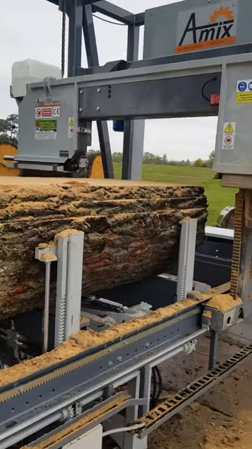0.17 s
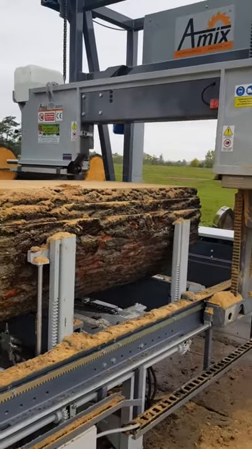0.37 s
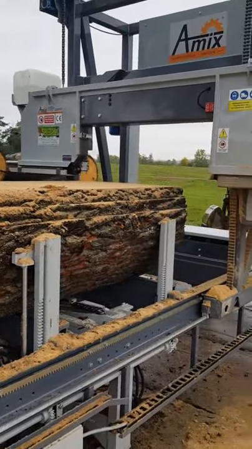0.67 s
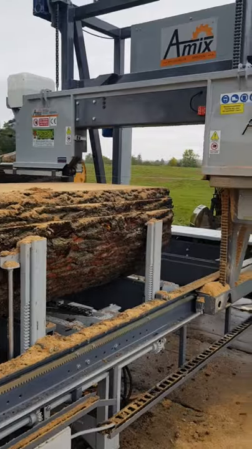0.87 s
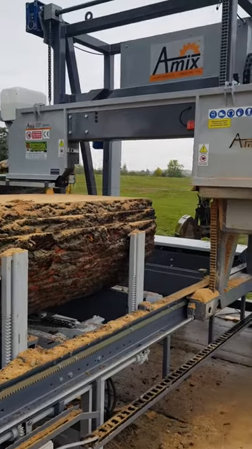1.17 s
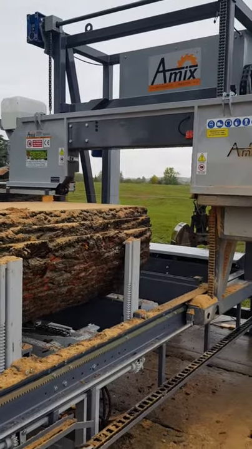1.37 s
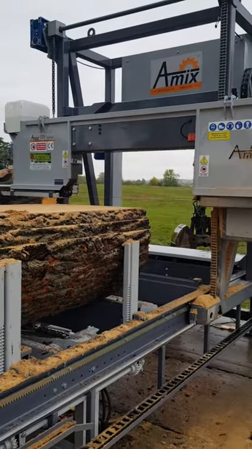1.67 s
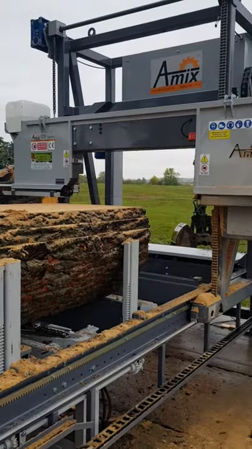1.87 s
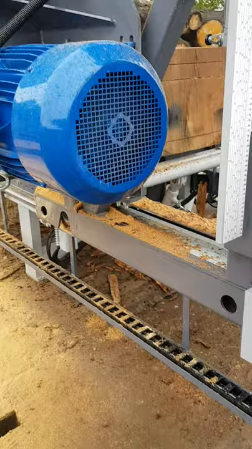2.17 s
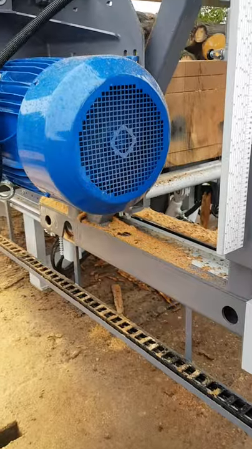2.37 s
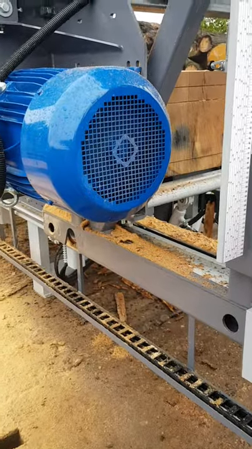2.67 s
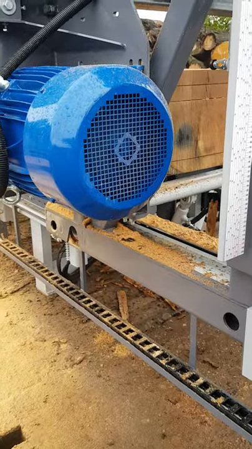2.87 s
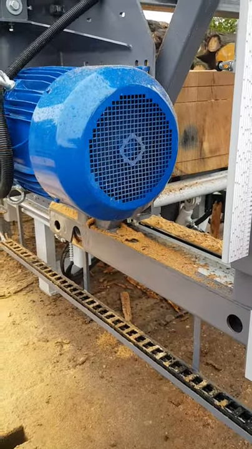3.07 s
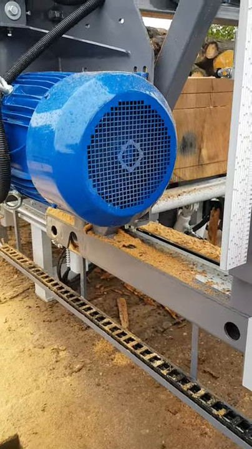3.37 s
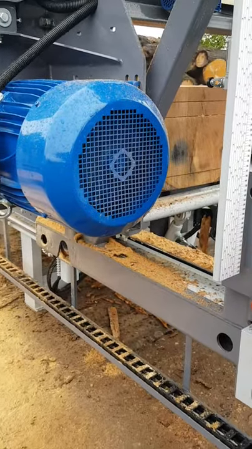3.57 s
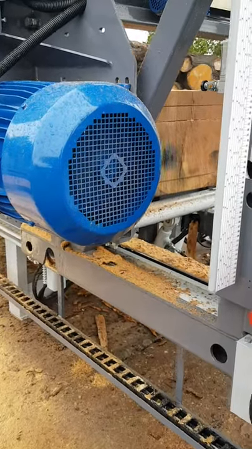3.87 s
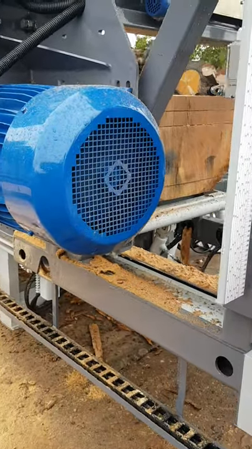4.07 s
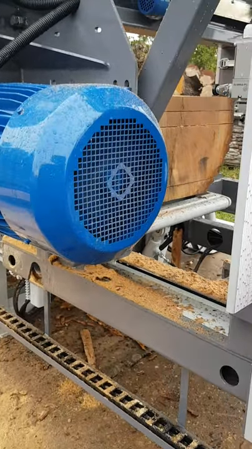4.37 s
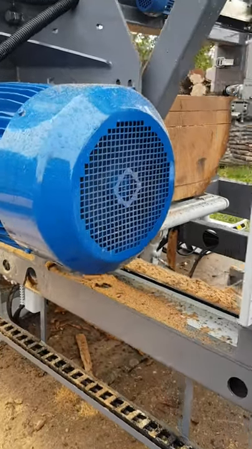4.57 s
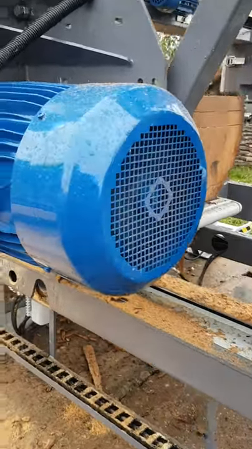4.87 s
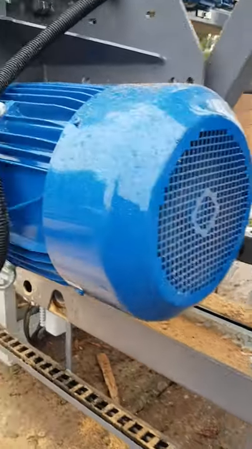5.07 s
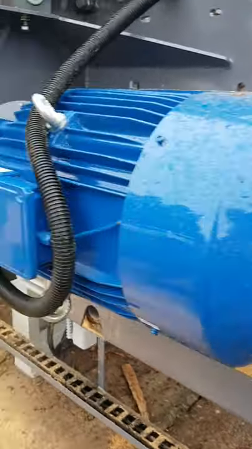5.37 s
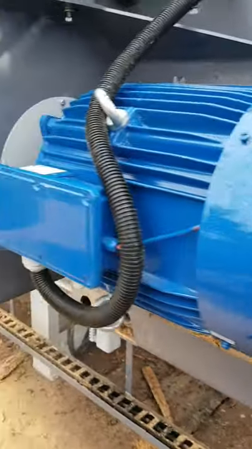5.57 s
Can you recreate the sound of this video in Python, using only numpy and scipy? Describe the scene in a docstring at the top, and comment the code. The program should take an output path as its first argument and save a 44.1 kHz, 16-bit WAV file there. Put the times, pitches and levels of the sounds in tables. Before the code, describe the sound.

Outdoors, a handheld stereo microphone hears a sawmill head rolling on rails: low rumble, motor hum, small squeals and steel knocks, then a faint high whistle as it slows, with wind thumps. Just after two seconds a hard cut jumps to much louder sawing beside the motor: buzzing tooth whine, bright dense hiss, droning steel guards and a deep shudder, growing closer until the end.

```python
"""Outdoors, at an electric band sawmill. First the saw head rolls along its rails: motor hum, rumble,
a few knocks, a thin drive whistle and puffs of wind. Then, abruptly, the blade is in the log, heard from
beside the main motor: the teeth whine, sawdust hisses and the fluttering band makes the steel guards drone.
Steel parts are noise sent through resonators, machine tones are wavering sines, and dust, wood and
rollers are shaped noise."""
import sys
import numpy as np
from scipy import signal
from scipy.fft import rfft, irfft
from scipy.io import wavfile
from scipy.ndimage import uniform_filter1d, map_coordinates

SR = 44100
rng = np.random.default_rng(int(sys.argv[2]) if len(sys.argv) > 2 else 0)


def dump(signal):
    """Clip the signal to [-1, 1] and save it as 16-bit WAV at the path in sys.argv[1]."""
    limited = np.clip(np.atleast_2d(signal).T, -1, 1)
    pcm = np.round(limited * 32767).astype(np.int16)
    wavfile.write(sys.argv[1], SR, pcm)


N = 252252

T = np.arange(N) / SR  # time of each sample in s
FREQ = np.maximum(np.arange(N // 2 + 1) * SR / N, 1)  # pitch of each spectrum bin in Hz
CUT_S = 2.157  # the sawing starts here
TOP_HZ = 15720  # the treble ends here
SLOWS_S = 0.91  # the rolling head gathers speed until here, then slows
PORT_LAG_S = .00012  # travel time between the two microphone ports


def sawing():
    """The band flutters in the cut and shakes guard and frame, while every tooth throws a puff of dust."""
    # loudness of the guard's boom: start_s, level_db
    boom_points = [(2.16, -29.5), (3.4, -28.5), (4.55, -27), (5.2, -30), (5.4, -25.5), (5.72, -25)]
    # shading by the machine: pitch_hz, left_minus_right_db
    shade = [(200, 0), (340, 1.5), (750, 0), (1000, -4.5), (1250, -.5), (1500, -3), (2100, -5), (3200, 0),
             (4600, 3), (6300, .5), (7900, -6), (10000, 1), (13000, -1.8), (15500, -.5)]
    # the roar lags in the right channel, by pitch: pitch_hz, phase_lag_radians
    right_lag = [(200, .1), (750, .1), (1000, .8), (1300, 1.8), (1800, 2.5), (3000, 2.8), (5000, 4)]
    approach_s, approach_db_per_s = 3.41, 1.5  # from here the microphone moves in on the motor
    boom_db, = curves(boom_points)
    near_db = approach_db_per_s * np.maximum(T - approach_s, 0)
    load_db = blade_load()
    dust, spray = sawdust_jet(load_db)
    steel = guard(load_db, boom_db) + frame(load_db, near_db)
    left, right = steel + kerf(load_db, near_db) + shudder() + motor(boom_db) + drone() + fan()
    roar = np.array([left, shape(right, np.exp(-1j * db_at(right_lag, FREQ)))])
    return shape(roar + dust, pan(db_at(shade, FREQ))) + singing(spray)


def teeth():
    """Teeth strike knotty wood, each with its own force; each partial swells and fades on its own at each ear."""
    # teeth entering the wood: time_s, teeth_per_s
    tooth_rate = [(2.16, 418.2), (2.9, 417.1), (3.6, 416.9), (4.15, 418.1), (4.6, 417.1), (5.1, 417.6),
                  (5.72, 417.7)]
    # partials of the tooth whine: pitch_hz, relative_level_db
    whine_levels = [(417, -24), (835, -25), (1250, -26), (1670, -18.5), (2100, -24.5), (2500, -30),
                    (2920, -28.5), (3340, -29), (3760, -30.5), (4170, -27), (4600, -30), (5400, -28),
                    (5850, -23), (6260, -21.5), (6670, -17.5), (7100, -18.5), (7500, -21), (8340, -21),
                    (8800, -26.5), (10000, -24), (10400, -19), (10900, -24), (12500, -27), (13500, -23),
                    (15000, -25)]
    fade_db, jitter_hz, rough_db = 3.3, .35, 2.3
    rate = curves(tooth_rate)[0]
    phase = 2 * np.pi * np.cumsum(rate + jitter_hz * walk(25)) / SR
    out = np.zeros((2, N))
    for k in np.arange(1, int(TOP_HZ / rate.mean()) + 1):
        level = undb(db_at(whine_levels, k * rate.mean()))
        for ear in range(2):
            start = rng.uniform(0, 2 * np.pi)
            partial = np.sin(k * phase + start + walk(6)) * undb(fade_db * walk(7))
            out[ear] += level * unit(partial)
    return out * unit(undb(rough_db * walk(170))), phase


def sawdust_jet(load_db, tooth_puff=0.089):
    """Sawdust hisses out as grainy noise that puffs at each tooth, mixed with the whine of the teeth."""
    # strength of the jet before a small trim: time_s, level_db
    jet = [(2.17, -24.5), (2.24, -23.5), (2.39, -25), (3.29, -26), (3.35, -27), (4.17, -26), (4.55, -25),
           (4.72, -27), (5.13, -25.5), (5.7, -28)]
    # side of the jet: time_s, left_minus_right_db
    jet_side = [(2.16, 0.5), (3.6, -1), (5.72, 1)]
    # gentle brightening of the hiss toward the top: pitch_hz, relative_level_db
    spray_tilt = [(3000, -0.5), (7000, -1), (10400, 0), (13000, 0), (15600, 0.5)]
    # spectrum of the dust before the brightening: pitch_hz, relative_level_db_per_hz
    dust_spectrum = [(1650, -34), (2800, -5.5), (3760, -9.5), (3950, -10.5), (4130, -7), (4800, -7),
                     (5580, -5), (6040, -2), (6930, 0), (8110, -3.5), (8780, -6), (9600, -4.5), (10500, -1),
                     (11200, -4), (12200, -4), (13100, -2), (14000, -6), (15600, -5.5)]
    trim_db = 0.36
    whine, phase = teeth()
    puffs = 1 + tooth_puff * np.cos(phase)
    spray = air(600, grain_db=3.0, direct=0.017) * puffs * undb(0.4 * load_db + .5 * walk(60))
    spray = shimmer(spray, width_hz=150, rate=8, depth_db=2.6)
    left, right = colour(colour(spray, spray_tilt), dust_spectrum)
    hiss = np.array([reflections(left), reflections(late(right, PORT_LAG_S))])
    mix = undb(2.5) * hiss + undb(7.0) * whine
    return mix * undb(trim_db + curves(jet)[0]) * pan(curves(jet_side)[0]), spray


def blade_load(lap_hz=5.7, lap_db=0.7, wheel_db=0.46, flutter_db=1.0):
    """Force on the band in dB: it swings once a lap and once a wheel turn, flutters, and jumps at snatches."""
    # the band snatches in the cut: start_s, extra_force_db
    snatches = [(2.58, 8.5), (3.075, 5.5), (3.24, 2), (3.585, 4.5), (3.645, 7.5), (4.151, 3.5), (4.277, 6),
                (4.328, 1.5), (4.54, 3.5), (4.654, 3.5), (4.923, 2), (5.092, 7.5), (5.255, 2.5),
                (5.612, 6.5), (5.668, 2)]
    lap = 2 * np.pi * np.cumsum(lap_hz + 0.29 * walk(2.55)) / SR
    swing_db = lap_db * np.sin(lap) + wheel_db * np.sin(2 * lap)
    return swing_db + flutter_db * walk(90) + jolts(snatches, decay_s=0.027)


def guard(load_db, boom_db):
    """The fluttering band shakes the blade guard, whose steel booms at its own pitches."""
    # resonances of the guard: pitch_hz, width_hz, relative_level_db
    guard_modes = [(298, 40, -5), (326, 36, -6.5), (353.3, 18.6, -1)]
    return ring(guard_modes, undb(load_db), 420) * undb(boom_db)


def frame(load_db, near_db):
    """The same force rings the frame, which grows louder as the microphone moves in."""
    # resonances of the frame: pitch_hz, width_hz, relative_level_db
    frame_modes = [(540.4, 24.5, -2), (605, 37, -1), (694, 90, 2), (816, 10, -14), (1009, 58, 4.5),
                   (1070, 41, 0), (1244, 97, -5), (1340, 27, -3), (1393, 33, 0), (1515, 40, -4),
                   (1702, 193, -6.5), (1952, 114, -5), (2252, 123, -6.5), (2670, 290, -11.5),
                   (3660, 17, -5.5)]
    steel = ring(frame_modes, undb(load_db), 530, direct=0.22, sway_db=1.5)
    return steel * undb(-25.5 + near_db)


def kerf(load_db, near_db):
    """Tearing fibres rasp in the kerf, the slot being cut: grainy noise."""
    # spectrum of the rasp: pitch_hz, relative_level_db_per_hz
    kerf_spectrum = [(60, -45), (150, -9), (200, -1), (450, -2), (900, 0.5), (1800, -2.5), (2500, -5),
                     (3500, -12), (6000, -16)]
    fibres = shimmer(air(1100, grain_db=2.2, direct=0.2), width_hz=60, rate=20, depth_db=4.2)
    return colour(fibres * undb(0.47 * load_db), kerf_spectrum) * undb(-27 + 1.09 * near_db)


def singing(spray):
    """The blade sings in the cut: bands of the spray noise swell and ease, louder on the right."""
    # each song: peak_s, half_length_s, level_db before panning, centre_hz, width_hz of each filter stage
    sings = [(2.22, 0.12, -34, 15000, 350), (2.35, 0.62, -38, 7430, 1500), (2.3, 0.44, -38, 6400, 500),
             (3.1, 0.21, -38, 8200, 400), (3.25, 0.27, -32, 13400, 700), (3.6, 0.38, -36, 10400, 300.8),
             (4.5, 0.16, -40, 6600, 350)]
    return bursts(sings, spray) * pan(-6)


def drone():
    """The band wheels hold one narrow tone; steel panels near it flare up and howl in turn."""
    # main drone of the wheels: time_s, pitch_hz, level_db
    wheel_tone = [(2.16, 323.4, -25.5), (2.5, 331, -29), (2.8, 325.4, -28.5), (3.1, 330.9, -33),
                  (3.4, 326, -28), (3.7, 328.7, -30.5), (4.02, 326, -24.5), (4.25, 327.9, -35),
                  (4.85, 332.3, -28), (5.17, 327, -35.5), (5.4, 330.7, -26), (5.72, 336.7, -25.5)]
    # howling panels: peak_s, half_length_s, peak_level_db, pitch_hz
    howl_table = [(2.65, 0.044, -41, 359), (3.253, 0.044, -30.5, 490), (3.62, 0.13, -31, 344.4),
                  (4.304, 0.075, -26.5, 365), (4.5, 0.21, -29.5, 343), (4.551, 0.075, -29, 302.7),
                  (4.7, .15, -37, 718.5), (4.924, 0.067, -34, 349), (5.15, 0.22, -32, 675),
                  (5.22, 0.071, -28, 617.3), (5.679, .09, -21, 348)]
    hz, db = curves(wheel_tone)
    howls = sum(undb(peak_db) * bump(s, half_s) * tone(panel_hz, 12, waver_db=1.5)
                for s, half_s, peak_db, panel_hz in howl_table)
    return undb(db) * tone(hz, 2.47, waver_db=0.55) + howls


def motor(boom_db):
    """Motor and wheels hum on steady tones that partly follow the guard's boom."""
    # tones: pitch_hz, level_db at the average boom, wander_width_hz
    motor_tones = [(166.8, -36.5, 6.3), (248.2, -43.5, 6), (504, -44, 8)]
    hums = sum(undb(db) * tone(hz, width, waver_db=1.0) for hz, db, width in motor_tones)
    return hums * undb(0.42 * (boom_db - boom_db[T > CUT_S].mean()))


def fan():
    """The cooling fan adds one wavering tone that swells twice, most strongly near the end."""
    # loudness of the fan: time_s, level_db
    fan_levels = [(2.16, -37), (3.2, -33.5), (3.7, -41), (4.9, -46), (5.15, -30.5), (5.42, -26),
                  (5.72, -41)]
    return tone(980, 8.57) * undb(curves(fan_levels)[0])


def shudder():
    """The machine shudders: deep, steady noise."""
    # spectrum of the shudder: pitch_hz, relative_level_db_per_hz
    shudder_spectrum = [(20, -27), (32, -2.5), (46, -0.5), (60, -1.5), (85, -11), (130, -4.5), (200, -3.5),
                        (300, -43)]
    return colour(air(1500), shudder_spectrum) * undb(-36.5)


def rolling():
    """The head travels: rollers rumble, squeal and ring the rails over the hum of the drive."""
    # a roller rubs its rail and sets it ringing: peak_s, half_length_s, extra_force_db
    rubs = [(0.215, 0.075, 14.5), (0.365, 0.06, 9), (0.616, 0.059, 17), (0.714, 0.028, 12.5),
            (0.831, 0.028, 14.5), (0.985, 0.055, 11), (1.156, 0.034, 8), (1.248, 0.025, 7),
            (1.358, 0.026, 13.5), (1.505, 0.056, 14)]
    # rollers jolt over sawdust on the rails: start_s, extra_force_db
    bumps = [(.094, 11), (.148, 0), (.18, -4), (.314, 14), (.53, 10), (.563, 5), (.798, 4), (.95, 3),
             (1.125, 4), (1.355, 13), (1.735, 20)]
    rub_db = swells(rubs)
    bump_db = jolts(bumps, decay_s=0.01) + 2.2 * walk(43.5)
    rollers = rumble(bump_db) + rails(rub_db, bump_db) + roller_hiss(rub_db, bump_db)
    drive = feed_gear() + motor_hum() + drive_whistle()
    return thin_left(rollers + drive + knocks() + scrapes() + breeze() + wind())


def rumble(bump_db):
    """The rollers rumble on the rails: low noise that follows the jolts and the speed."""
    # spectrum of the rumble: pitch_hz, relative_level_db_per_hz
    rumble_spectrum = [(20, -25), (60, 1.5), (100, -1.5), (160, 3.5), (250, -7.5), (290, -7.5), (400, -11),
                       (520, -11.5), (900, -17.5), (1500, -32), (4000, -82)]
    # how it follows the speed: top_speed_db, rise_db_per_s, fall_db_per_s
    rumble_ride = (-35.5, 2.5, 8.2)
    return colour(air(800) * undb(0.21 * bump_db), rumble_spectrum) * undb(ride(*rumble_ride))


def rails(rub_db, bump_db, squeal_hz=692):
    """Rail resonances and a squeal glide together in pitch, and swell when a roller rubs."""
    # rail resonances before the glide: pitch_hz, width_hz, relative_level_db
    rail_modes = [(648, 74, 3.5), (707, 75, 0), (794, 68, -0.5), (1160, 160, -22), (1900, 540, -21)]
    # the ring sinks at first, then creeps back up a little: time_s, pitch_ratio
    rail_pitch = [(0, 1.05), (.25, 1.01), (.42, 0.97), (.62, .965), (.85, .96), (1.15, 0.95), (2.15, 0.98)]
    # how it follows the speed: top_speed_db, rise_db_per_s, fall_db_per_s
    rail_ride = (-51.5, 1.9, 32)
    slip_s = np.cumsum(1 - curves(rail_pitch)[0]) / SR  # a growing delay lowers the pitch
    steel = ring(rail_modes, undb(1.2 * walk(70)), 800)
    squeal = tone(squeal_hz, 20, waver_db=1) * undb(1.5 * walk(90))
    ringing = .95 * steel + .95 * squeal
    gliding = np.array([late(x, slip_s) for x in ringing])
    return gliding * undb(ride(*rail_ride) + rub_db + 0.92 * bump_db)


def roller_hiss(rub_db, bump_db):
    """The rollers' hiss fades slowly, then faster as the head slows; rubs lift it slightly; its top stays."""
    # spectrum of the hiss before its top is split off: pitch_hz, relative_level_db_per_hz
    hiss_spectrum = [(590, -42), (1000, -12), (1150, 1.5), (1330, -6), (1940, -5), (2770, -11.5),
                     (3830, -17), (5040, -24), (5780, -21), (7610, -38), (12600, -38.5), (15500, -45)]
    # level where the head starts to slow, and slopes (a negative rise is a fade):
    # level_db, rise_db_per_s, fall_db_per_s
    hiss_ride = (-51, -1.1, 8.2)
    hiss = colour(air(900, grain_db=2.5) * undb(0.17 * bump_db), hiss_spectrum)
    top = shape(hiss, 1 / (1 + (7000 / FREQ) ** 4))
    return (hiss - top) * undb(ride(*hiss_ride) + 0.098 * rub_db) + top * undb(-37.5)


def feed_gear():
    """The feed gear sounds a few wavering tones and gets louder as it labours."""
    # gear tones: pitch_hz, relative_level_db
    gear_tones = [(250, -4.5), (314, -3.5), (410, -7.5), (455, -13.5)]
    # how they follow the speed: top_speed_db, rise_db_per_s, fall_db_per_s
    gear_ride = (-39.5, 16.5, 17.6)
    # the gear labours: peak_s, half_length_s, extra_force_db
    surges = [(.47, 0.058, 3), (.96, 0.054, 5), (1.13, 0.061, 4.5), (1.55, 0.16, 6.5)]
    tones = sum(undb(db) * tone(hz, 19, waver_db=2.5) for hz, db in gear_tones)
    return tones * undb(ride(*gear_ride) + swells(surges))


def knocks(body_db=3, rattle_db=-2):
    """Loose steel parts strike the carriage: each blow rings the modes near its own pitch, and rattles out."""
    # knocks: start_s, level_db before the body and rattle trims, pitch_hz, rattle_fade_s for a 60 dB fall
    blows = [(0.400, -29, 1150, 0.07), (.409, -26, 795, 0.13), (0.593, -38, 1900, 0.097),
             (.583, -37, 680, 0.09), (.627, -31, 760, 0.2), (0.904, -34, 1900, 0.057),
             (1.018, -32, 900, 0.1), (1.148, -39.5, 1100, .1), (1.238, -40, 900, 0.077),
             (1.28, -46, 1050, .07), (1.464, -44, 800, .05), (1.518, -40.5, 808, .08),
             (1.723, -31.5, 1110, 0.024), (1.877, -41, 950, 0.031)]
    # what the carriage rings with: pitch_hz, width_hz, relative_level_db
    carriage = [(660, 190, 2.5), (844, 35, 2.5), (1113, 91, -1), (1540, 610, -12.5), (3220, 2000, -15)]
    out = np.zeros((2, N))
    steel = rfft(ring(carriage, 1, 810))
    for s, db, hz, t60 in blows:
        age = np.maximum(T - s, 0)
        body = 0
        for f, width, mode_db in carriage:
            nearness = 1 / (1 + (f / hz - hz / f) ** 2)
            fade = np.exp(-np.minimum(np.pi * width * age, 20))
            body = body + undb(mode_db) * nearness * np.sin(2 * np.pi * f * age) * fade
        fade = undb(-60 * age / t60) * np.minimum(age / .001, 1)
        rattle = fade * unit(irfft(steel * resonance(hz, .7 * hz), N))
        out += undb(db) * (undb(body_db) * body / np.abs(body).max() + undb(rattle_db) * rattle)
    return out


def scrapes(breadth=0.79):
    """A roller crushes grit and sawdust: a short, broad, grainy burst."""
    # scrapes: peak_s, half_length_s, level_db, centre_hz
    grit = [(0.413, 0.017, -53, 2700), (.45, .035, -58, 6500), (0.6, .008, -48, 3020),
            (.614, .008, -48, 2600), (.631, .009, -49, 2500), (.725, .006, -59, 11000),
            (.83, .035, -51, 2460), (0.91, .009, -55, 7000), (0.97, 0.053, -47.5, 1280),
            (1.137, 0.024, -50.5, 2280), (1.907, .012, -58, 2500)]
    rows = [(s, half_s, db, hz, breadth * hz) for s, half_s, db, hz in grit]
    return bursts(rows, air(900, grain_db=7))


def drive_whistle():
    """The motor drive whistles once while it brakes, on several wavering partials."""
    # partials: pitch_hz, wander_width_hz, relative_level_db, extra_fall_db_per_s
    whistle_partials = [(2920, 110, -7, 0), (6002, 45, -3.5, 0), (6040, 220, -9, 0), (9000, 260, -14, 20),
                        (5650, 260, -14, 0)]
    return sum(undb(db) * tone(hz, width, waver_db=4.0) * braking(sag)
               for hz, width, db, sag in whistle_partials)


def braking(extra_sag_db_per_s):
    """Gain of one partial of the drive's whistle: it swells, sags slowly and stops."""
    from_s, to_s, attack_s, release_s = 1.346, 1.97, 0.22, .04
    base_db, sag_db_per_s = -56, 10
    attack = np.clip((T - from_s) / attack_s, 0, 1)
    release = np.exp(-np.maximum(T - to_s, 0) / release_s)
    held_s = T - from_s - attack_s
    return attack * release * undb(base_db - (sag_db_per_s + extra_sag_db_per_s) * held_s)


def motor_hum():
    """The motor hums on one low, wavering tone."""
    # loudness of the hum under load: time_s, level_db
    hum_levels = [(0, -37), (.3, -35), (.37, -42), (.43, -33), (.95, -34), (1.06, -37), (1.14, -32),
                  (1.25, -34.5), (1.7, -37), (2.1, -39)]
    return tone(49.3, 0.76, waver_db=3.0) * undb(curves(hum_levels)[0])


def breeze():
    """Moving air rustles on the microphone ports: low noise, separate at each port."""
    # spectrum of the breeze: pitch_hz, relative_level_db_per_hz
    breeze_spectrum = [(20, -17), (50, 2), (120, -6), (250, -10), (600, -47)]
    # how it follows the speed: top_speed_db, rise_db_per_s, fall_db_per_s
    breeze_ride = (-42, 1.6, 1.2)
    return colour(rng.standard_normal((2, N)), breeze_spectrum) * undb(ride(*breeze_ride))


def wind():
    """Each eddy pushes the microphone's diaphragm once and lets it swing back."""
    # wind puffs: peak_s, peak_level_db, pitch_hz
    puff_table = [(.115, -27, 45), (.305, -39, 45), (1.495, -28, 60), (1.532, -20, 70), (1.755, -28, 80),
                  (1.892, -27, 55), (1.955, -20, 77), (2.01, -24, 71.5), (2.028, -23.5, 88.5),
                  (2.133, -27.5, 47.5)]
    return sum(undb(db) * np.cos(2 * np.pi * hz * (T - s)) * np.exp(-(2.3 * hz * (T - s)) ** 2)
               for s, db, hz in puff_table)


def thin_left(sound):
    """The sound reaches the left port a little later, and its bass drops out there in spells."""
    # spells with little bass on the left: start_s, end_s
    thin_spells = [(.125, 0.19), (.99, 1.1), (1.2, 1.54), (1.57, 1.99), (2.04, 2.1)]
    left, right = sound
    inside = sum(1. * ((T > a) & (T < b)) for a, b in thin_spells)
    thin = uniform_filter1d(inside, size=500)  # soft edges
    bass = shape(left, .94 / (1 + (FREQ / 270) ** 4))
    return np.array([late(left - thin * bass, PORT_LAG_S), right])


def ride(db, rise_db_per_s, fall_db_per_s):
    """Level in dB that follows the head's speed: one slope while it gathers speed, another as it slows."""
    before_s = np.maximum(SLOWS_S - T, 0)
    after_s = np.maximum(T - SLOWS_S, 0)
    return db - rise_db_per_s * before_s - fall_db_per_s * after_s


def bump(s, half_s):
    """A smooth hump over time with its peak of 1 at s."""
    return np.exp(-((T - s) / half_s) ** 2)


def swells(table):
    """Extra force in dB that rises and eases with each row."""
    return sum(db * bump(s, half_s) for s, half_s, db in table)


def jolts(table, decay_s):
    """Extra force in dB that jumps at each jolt and relaxes."""
    return sum(db * (T > s) * np.exp(-np.abs(T - s) / decay_s) for s, db in table)


def bursts(table, source):
    """Bands of a rough source, each swelling and easing once."""
    spectrum = rfft(source)
    return sum(undb(db) * bump(s, half_s) * unit(irfft(spectrum * resonance(hz, width) ** 2, N))
               for s, half_s, db, hz, width in table)


def ring(modes, drive, alike_hz, direct=0, sway_db=0):
    """Steel panels, each shaken by its own share of a rough force, which may sway slowly."""
    out = 0
    for hz, width, db in modes:
        force = drive * air(alike_hz, direct=direct)
        # two stages, each widened so that the pair has about the listed width
        panel = shape(force, resonance(hz, 1.64 * width) ** 2)
        out = out + undb(db + sway_db * walk(4)) * panel
    return unit(out)


def tone(hz, width_hz, waver_db=2):
    """A machine tone of rms 1 whose pitch and strength waver; wider tones waver faster in pitch."""
    phase = 2 * np.pi * np.cumsum(hz + width_hz / 2 * walk(16 + width_hz)) / SR
    return unit(np.sin(phase) * undb(waver_db * walk(9)))


def air(alike_hz, grain_db=0, direct=0):
    """Two channels of noise or uneven grains; well above alike_hz only the direct share is alike."""
    grains = np.minimum(rng.exponential(size=(2, N)), np.pi)
    mid, side = rng.standard_normal((2, N)) * undb(grain_db * grains)
    likeness = np.maximum(1 / (1 + (FREQ / alike_hz) ** 3), min(direct, 1))
    common = shape(mid, np.sqrt(1 + likeness))
    return unit(common + np.array([[1], [-1]]) * shape(side, np.sqrt(1 - likeness)))


def shimmer(x, width_hz, rate, depth_db):
    """Narrow bands of a sound swell and fade on their own, about rate times a second."""
    size = 1024
    hz, s, bands = signal.stft(x, SR, nperseg=size)
    place = np.meshgrid(hz / width_hz, s * rate, indexing="ij")
    swell = map_coordinates(rng.standard_normal((256, 256)), place, mode="wrap")
    return unit(signal.istft(bands * undb(depth_db * swell), SR, nperseg=size)[1][..., :N])


def reflections(x, count=3):
    """Nearby steel faces echo the sound; the comb they make shifts as the hand sways."""
    share, path_s, sway_s = .27, .003, .00005
    echoes = sum(share * late(x, path_s * rng.uniform(0.489, 2) + sway_s * walk(1.51))
                 for _ in range(count))
    return unit(x + echoes)


def late(x, seconds):
    """Delay one channel by a fixed or moving time."""
    return map_coordinates(x, [(T - seconds) * SR], order=3)


def pan(db):
    """Left and right gains for a level difference."""
    return undb(np.array([[.5], [-.5]]) * db)


def walk(rate):
    """Smooth chance with spread 1, changing about rate times a second."""
    knots = rng.standard_normal(4096)
    coarse_s = T[::64]
    return unit(np.interp(T, coarse_s, map_coordinates(knots, [coarse_s * rate], mode="wrap")))


def resonance(hz, width_hz):
    """Response of one damped resonator."""
    return 1 / (1 + 1j * (FREQ / hz - hz / FREQ) * hz / width_hz)


def colour(x, points):
    """Give a sound a spectrum, at rms 1."""
    return unit(shape(x, undb(db_at(points, FREQ))))


def shape(x, response):
    """Filter by a frequency response."""
    return irfft(rfft(x) * response, N)


def db_at(points, hz):
    """Read a curve over pitch on a log-frequency axis."""
    f, db = np.transpose(points)
    return np.interp(np.log(hz), np.log(f), db)


def curves(table):
    """One value per sample for each column of a timed table."""
    s, *columns = np.transpose(table)
    return [np.interp(T, s, c) for c in columns]


def unit(x):
    """Scale to rms 1."""
    return x / np.sqrt(np.mean(x ** 2))


def undb(db):
    """Decibels to gain."""
    return np.exp(np.asarray(db) * (np.log(10) / 20))


def scene():
    """The rolling head gives way at once to the cut."""
    before = np.clip((CUT_S - .008 - T) / .003, 0, 1)
    after = np.clip((T - CUT_S) / .01, 0, 1)
    return before * rolling() + after * sawing()


def record(dry):
    """The phone cuts the top steeply with a low-pass filter."""
    return signal.sosfilt(signal.ellip(12, .1, 80, TOP_HZ, fs=SR, output="sos"), dry)


dry = scene()
out = record(dry)
dump(out)
```